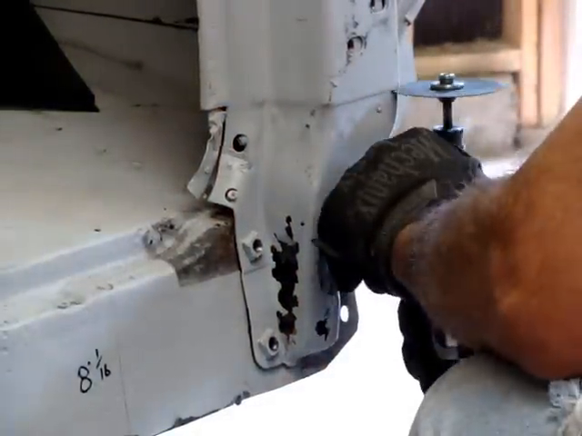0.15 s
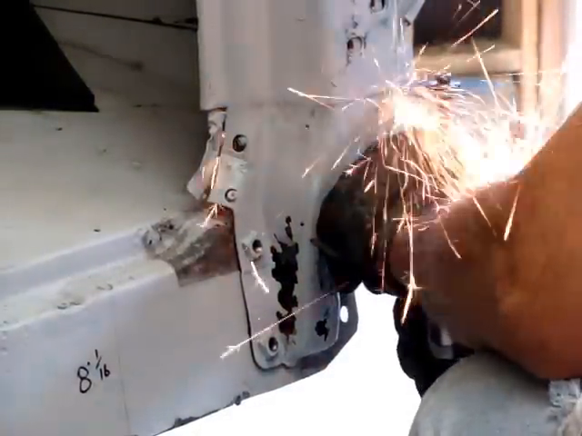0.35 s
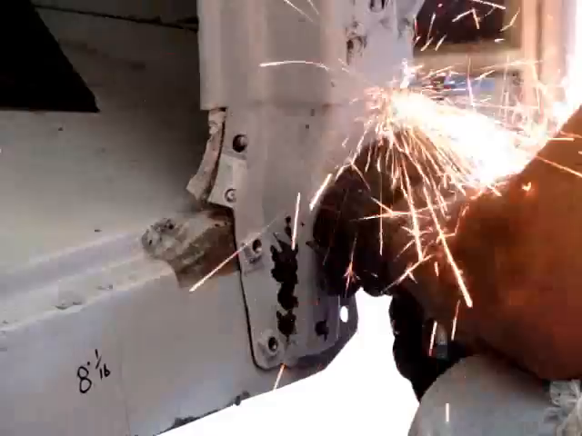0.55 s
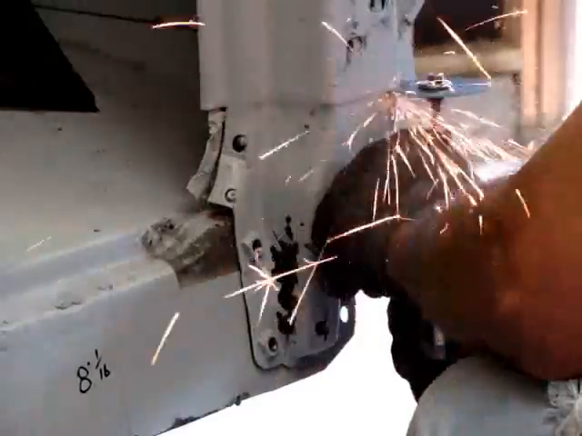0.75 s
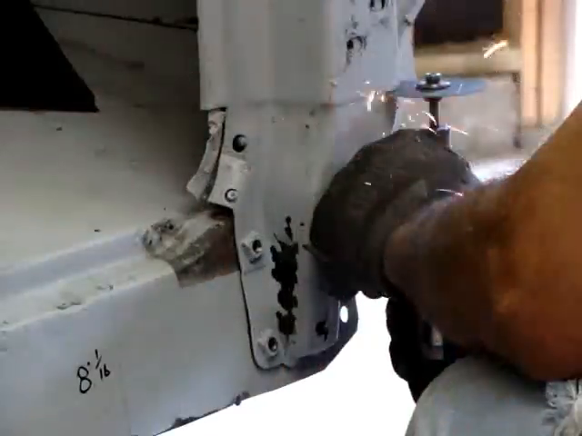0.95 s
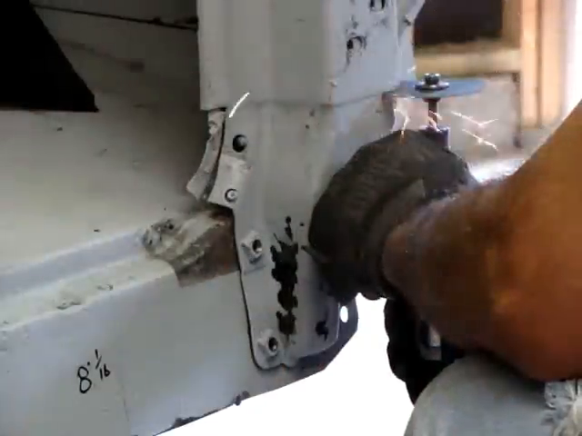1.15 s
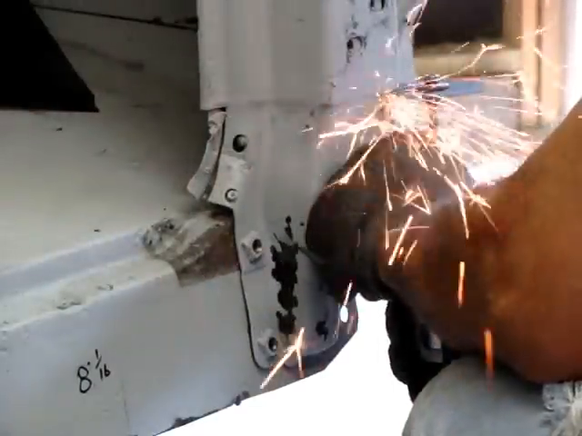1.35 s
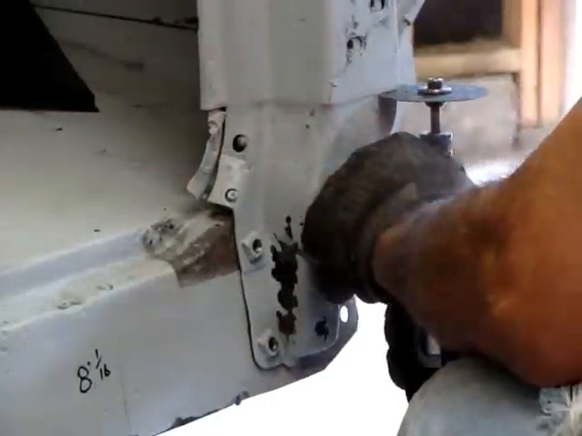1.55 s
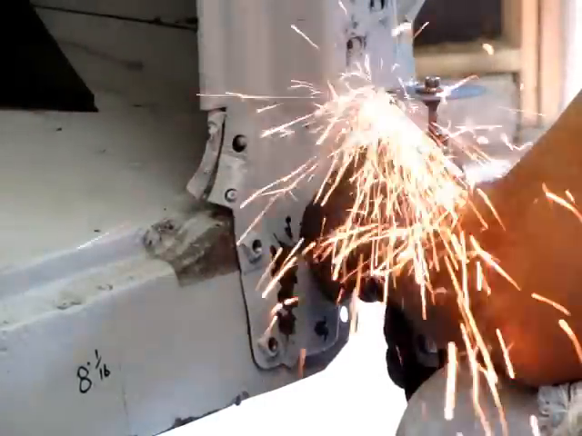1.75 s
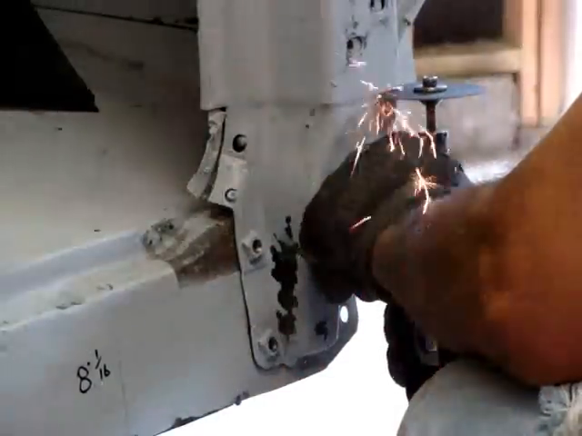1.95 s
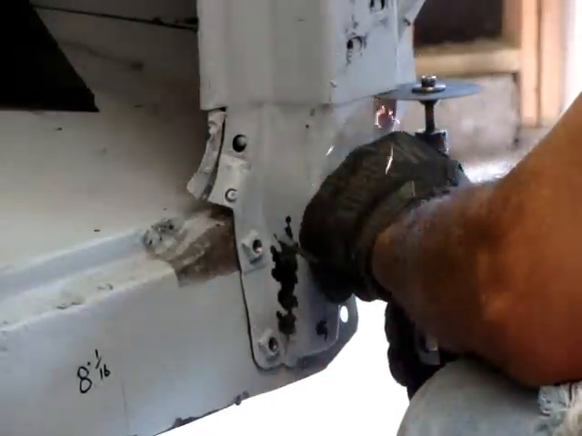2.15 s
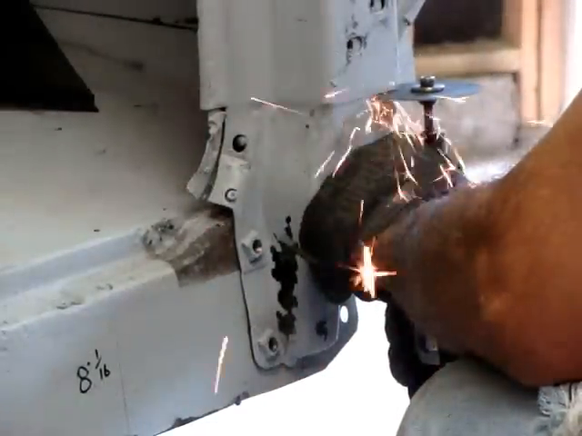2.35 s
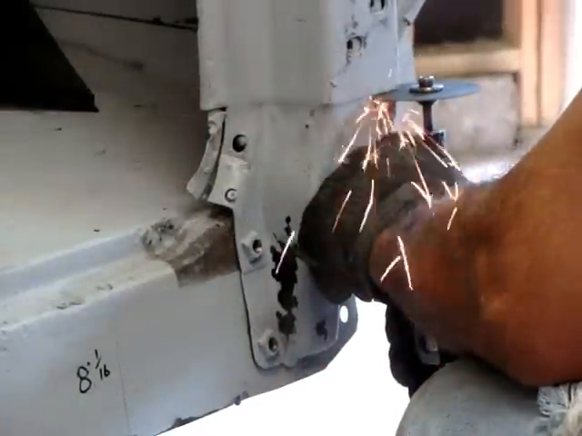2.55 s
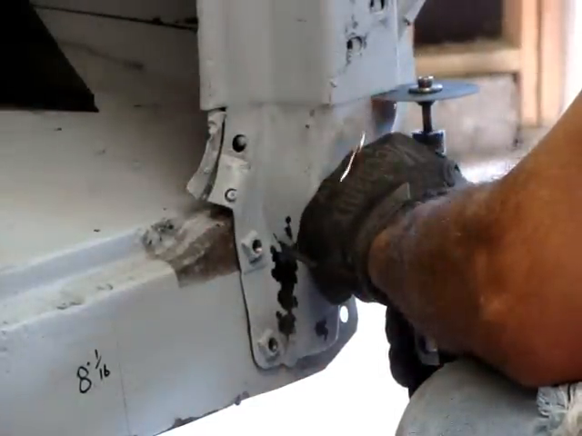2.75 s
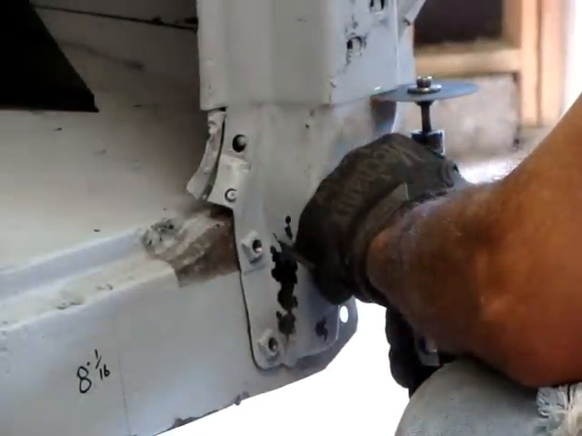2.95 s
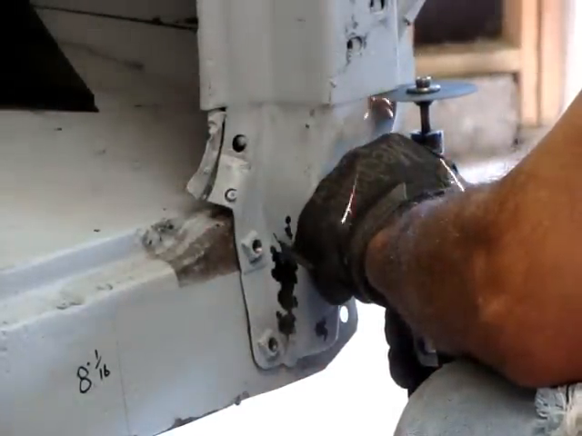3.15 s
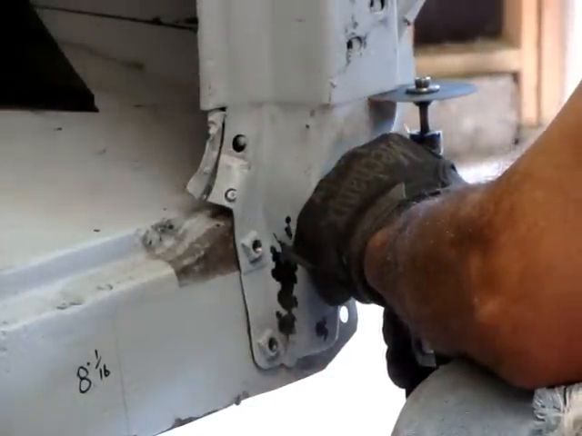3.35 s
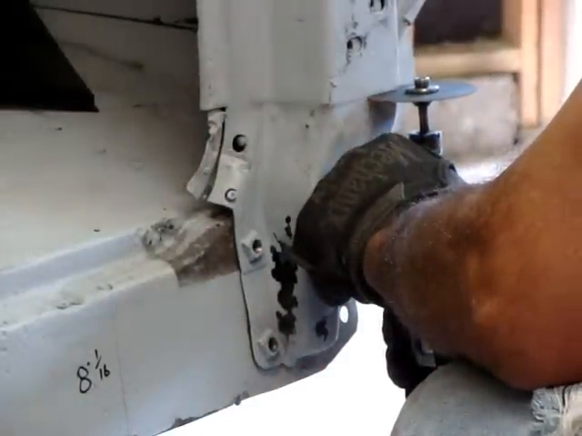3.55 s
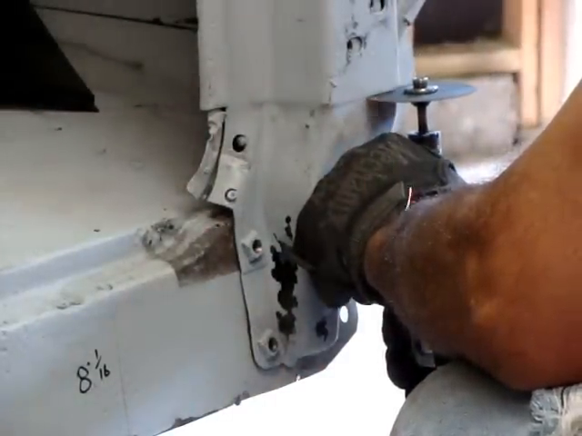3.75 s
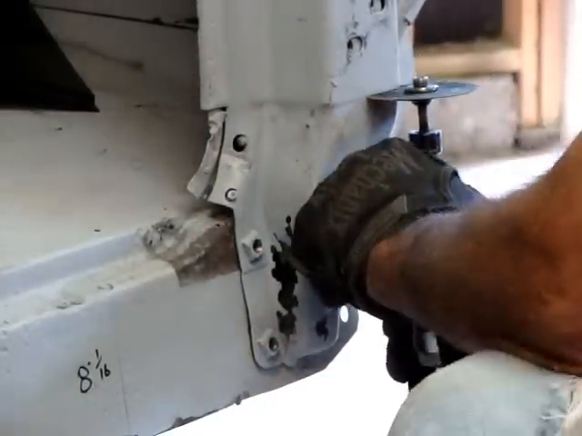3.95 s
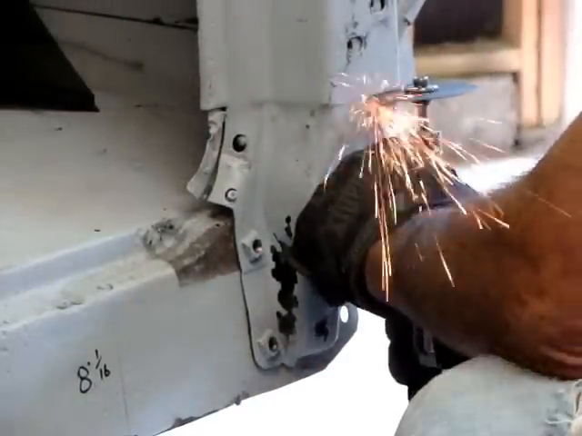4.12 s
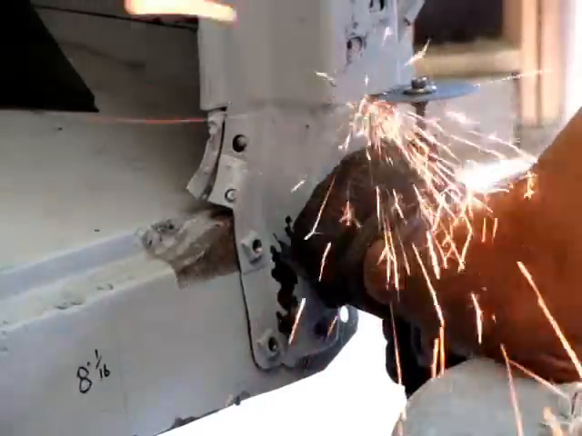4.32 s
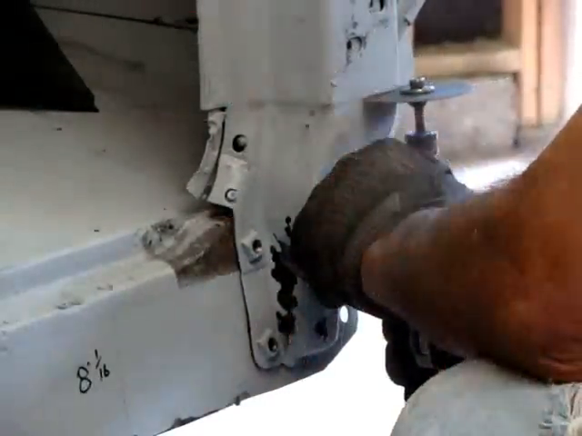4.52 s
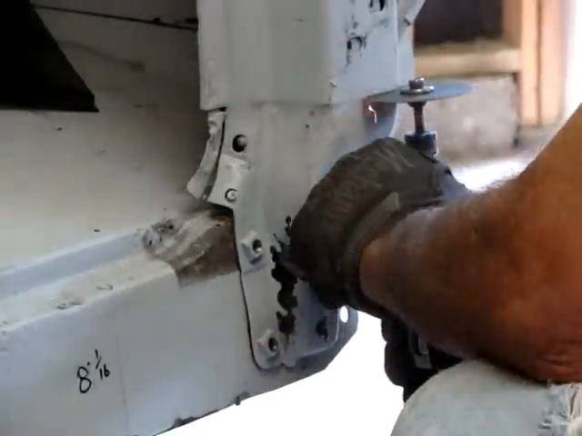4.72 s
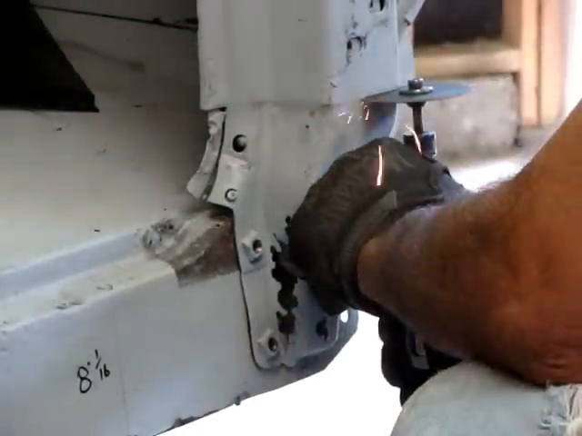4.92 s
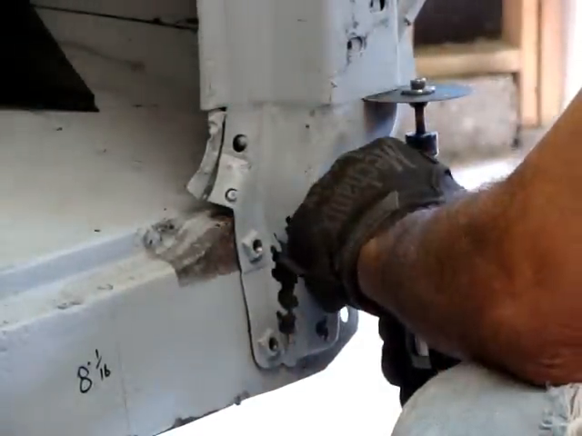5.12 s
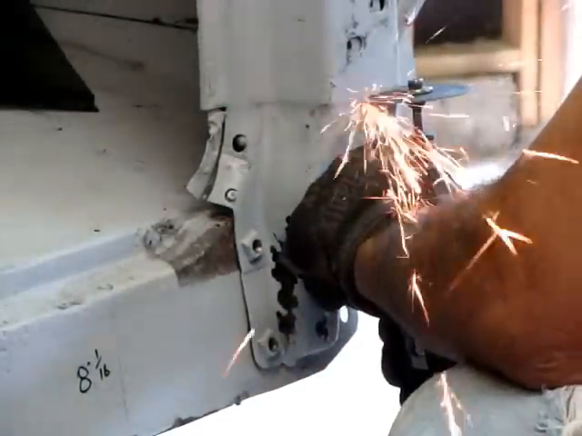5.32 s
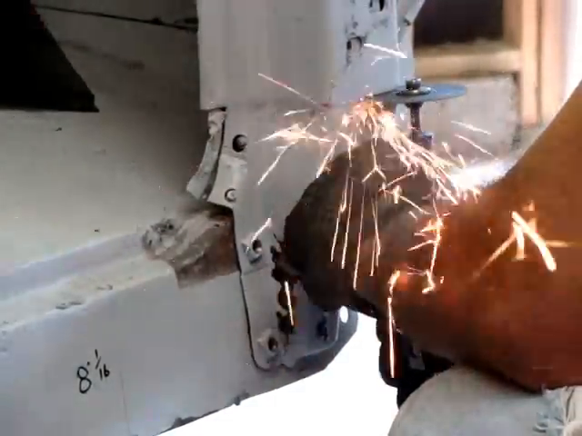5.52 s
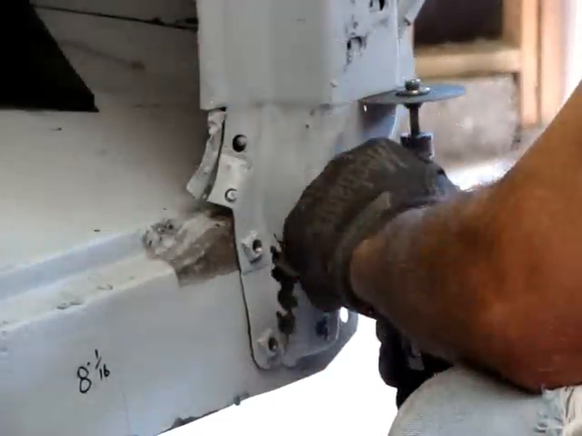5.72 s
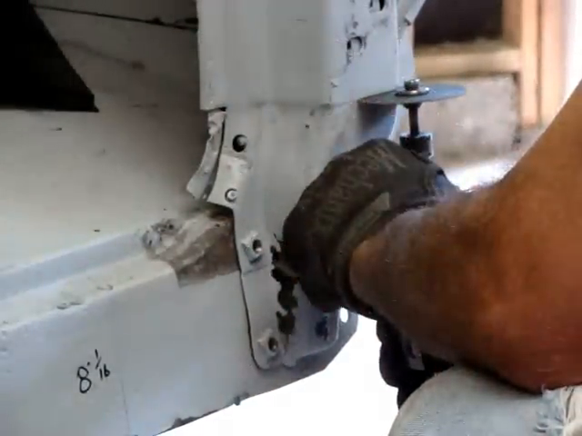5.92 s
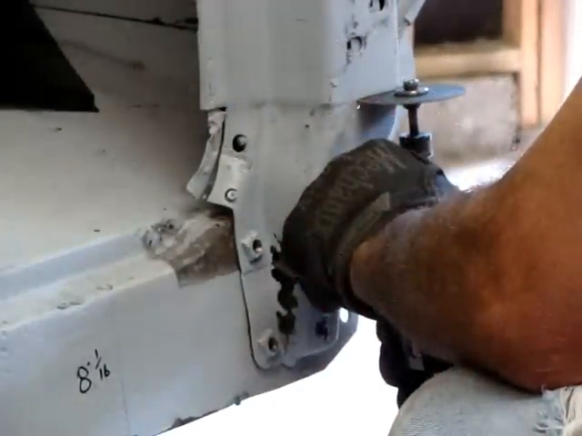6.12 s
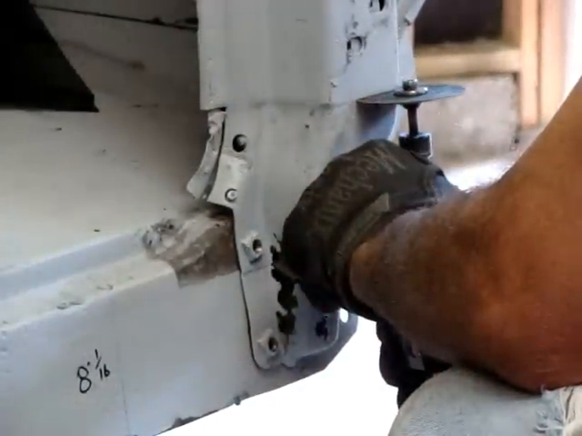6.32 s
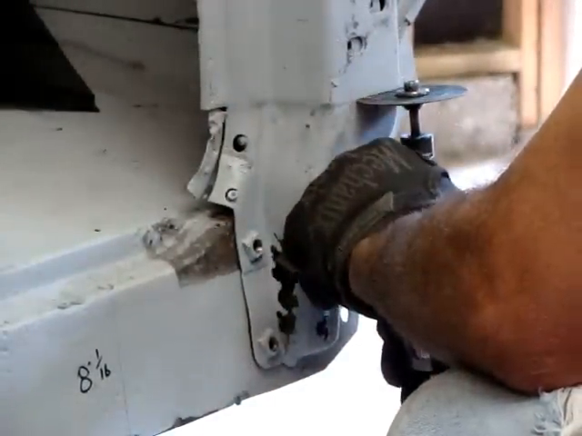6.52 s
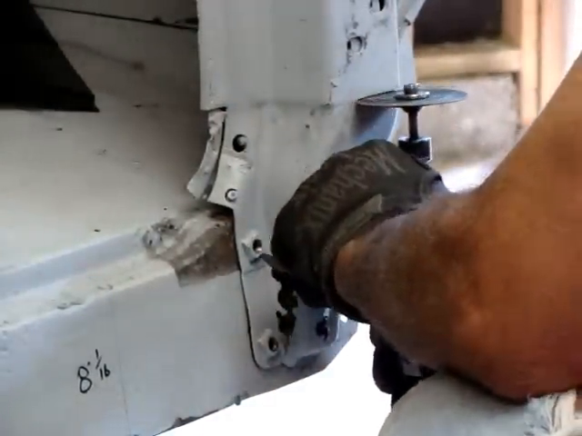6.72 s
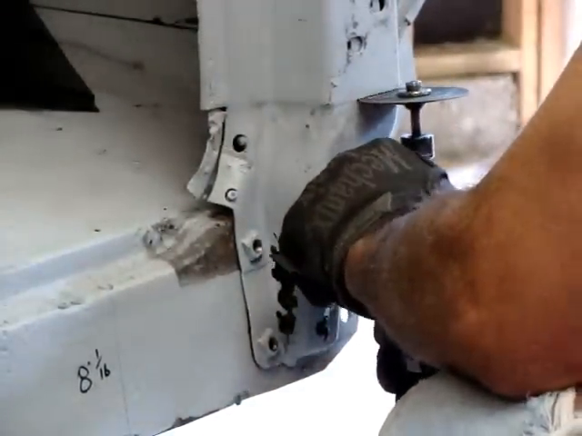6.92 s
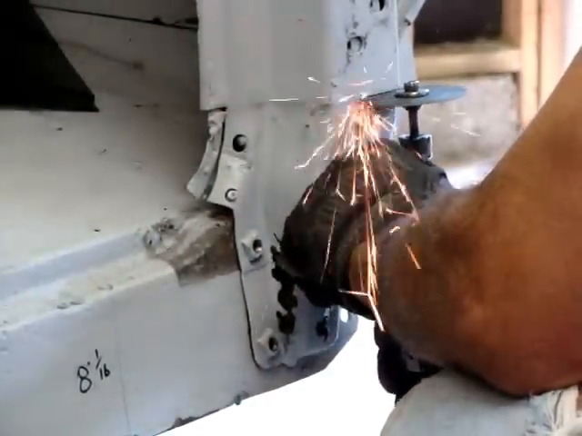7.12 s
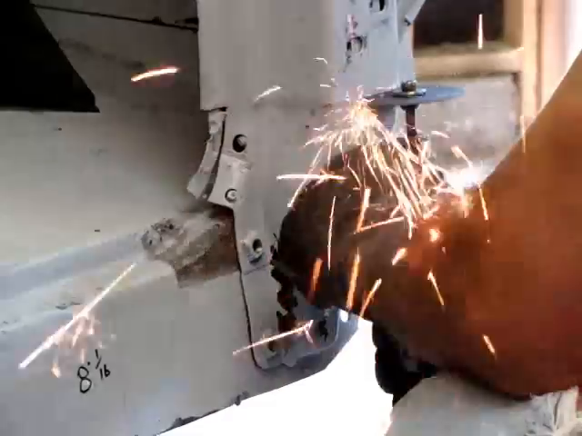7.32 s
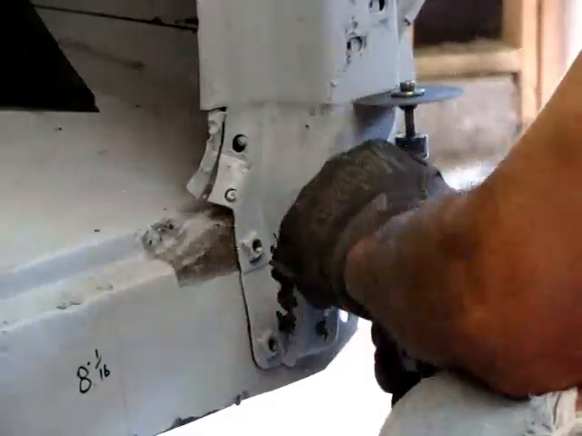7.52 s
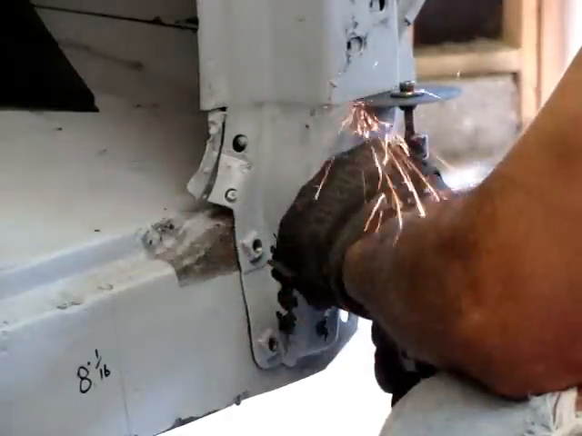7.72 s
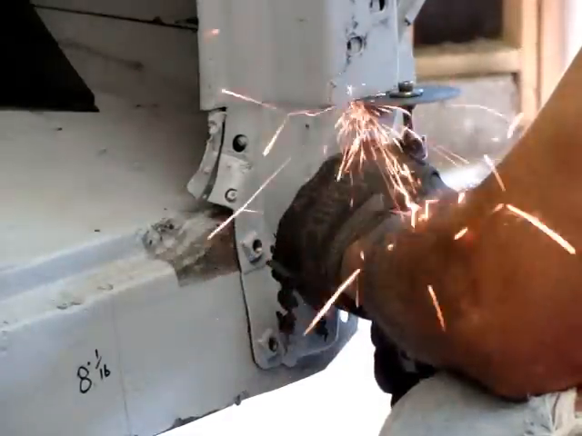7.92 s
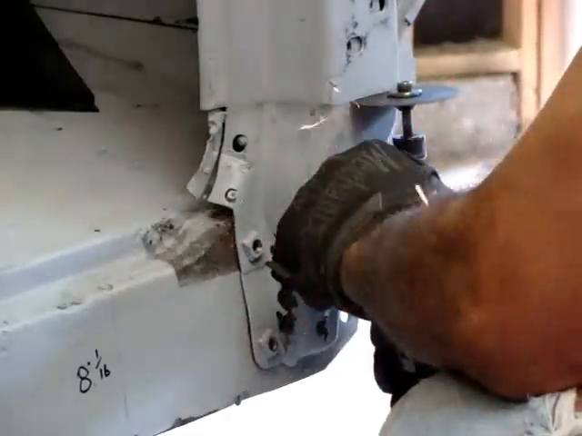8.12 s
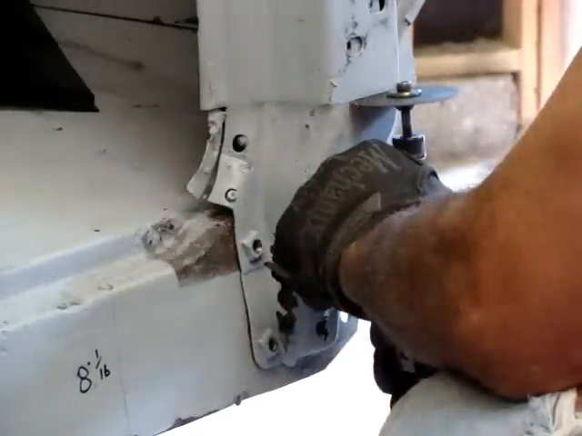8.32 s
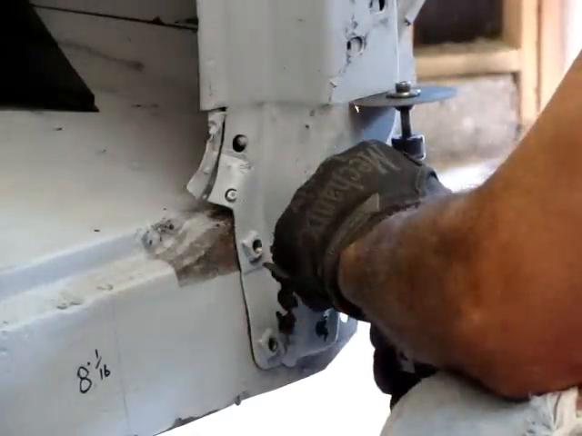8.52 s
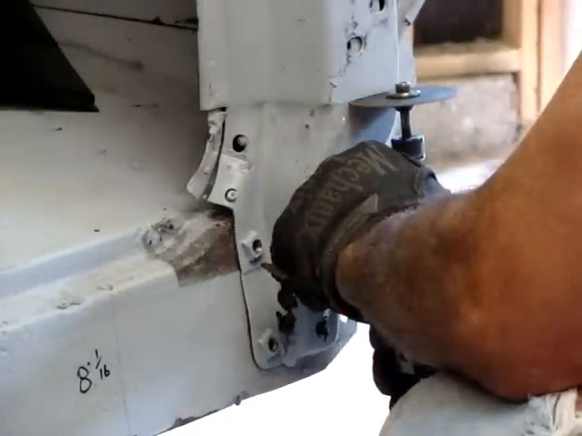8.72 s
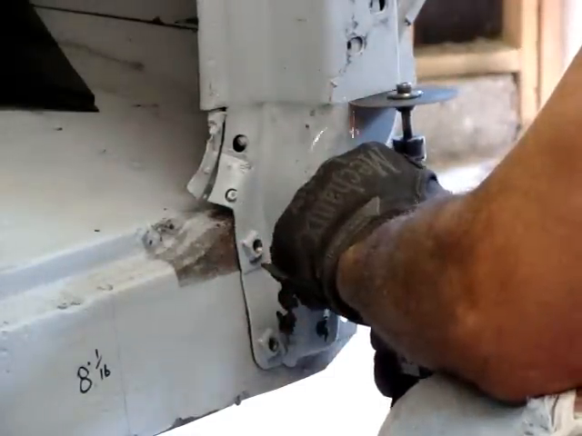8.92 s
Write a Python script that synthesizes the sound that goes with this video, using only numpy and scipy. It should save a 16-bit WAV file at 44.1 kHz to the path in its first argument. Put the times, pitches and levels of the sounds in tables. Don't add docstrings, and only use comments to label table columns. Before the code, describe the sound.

A small air-driven cutting wheel shrieks up, then bogs down rasping and hissing through sheet steel in repeated passes, with a compressor chugging briefly between cuts.

```python
import sys
import numpy as np
from scipy import signal
from scipy.fft import rfft, irfft
from scipy.io import wavfile
from scipy.ndimage import uniform_filter1d

SR = 44100
rng = np.random.default_rng(int(sys.argv[2]) if len(sys.argv) > 2 else 0)


def invert_db(level):
    return 10 ** (np.asarray(level, dtype=float) / 20)


def output_pcm(signal):
    pcm = np.clip(np.atleast_2d(signal).T, -1, 1) * 32767
    wavfile.write(sys.argv[1], SR, np.round(pcm).astype(np.int16))


N = 395136
TIME_S = np.arange(N) / SR

# [opens t/s, shuts t/s]
VALVE_OPEN = [
    (0.307, 1.57),
    (1.718, 3.93),
    (4.107, 5.1),
    (5.343, 6.46),
    (7.105, 9.1),
]
# [top t/s, top vane rate f/Hz, bog t/s, bog vane rate f/Hz,
# lateness of the fall (0-2)]
SPEED_SURGES = [(.44, 2176, .76, 790, 1.0), (.83, 800, .91, 675, 1.0), (.95, 660, 1.14, 454, .9),
                (1.49, 1090, 1.7, 450, 1.1), (1.83, 1170, 2.0, 500, .9), (2.09, 615, 2.216, 383, 1.0),
                (2.32, 510, 2.37, 495, 1.0), (2.48, 705, 2.53, 722, 1.0), (2.57, 716, 2.875, 406, .65),
                (2.99, 545, 3.094, 357, 1.0), (3.237, 559, 3.337, 378, 1.0), (3.42, 405, 3.64, 355, .4),
                (3.75, 536, 3.86, 420, 1.0), (4.235, 1910, 4.42, 900, .95), (4.45, 870, 4.78, 345, .45),
                (4.89, 565, 5.13, 279, 1.4), (5.437, 1425, 5.6, 860, .9), (5.63, 820, 5.773, 355, .7),
                (5.884, 452, 6.04, 335, .6), (6.24, 412, 6.36, 318, 1.0), (7.19, 1540, 7.68, 330, .85),
                (7.925, 980, 8.29, 415, 1.1), (8.5, 425, 8.575, 322, 1.0), (8.85, 410, 8.99, 350, 1.0)]


def rotor():
    starting_hz, spin_up_haste = 340.3, 2.3
    vane_hz = np.full(N, starting_hz)
    from_s, from_hz = 0, starting_hz
    for top_s, top_hz, bog_s, bog_hz, late in SPEED_SURGES:
        opened = max(opens for opens, _ in VALVE_OPEN if opens < top_s)
        fresh = opened > from_s
        if fresh:
            from_s, from_hz = opened, starting_hz
        rise = np.clip((TIME_S - from_s) / (top_s - from_s), 0, 1)
        fall = np.clip((TIME_S - top_s) / (bog_s - top_s), 0, 1)
        if fresh:
            rise = 1 - (1 - rise) ** spin_up_haste
        else:
            rise = np.sin(np.pi / 2 * rise) ** 2
        fall = np.sin(np.pi / 2 * fall ** late) ** 2
        shape = from_hz + (top_hz - from_hz) * rise + (bog_hz - top_hz) * fall
        vane_hz = np.where(TIME_S >= from_s, shape, vane_hz)
        from_s, from_hz = bog_s, bog_hz
    turn_hz = uniform_filter1d(vane_hz, size=600) / 4
    snatch = .003 + .045 * np.maximum(np.log2(135 / turn_hz), 0)
    turn_hz = turn_hz * (1 + snatch * drift(30))
    return turn_hz, 2 * np.pi * np.cumsum(turn_hz) / SR


# [multiple of the turn rate, level/dB]
ROTOR_ORDERS = [(2, -20), (3, -24), (4, 3.5), (5, -22), (6, -21), (7, -25), (8, 0.5), (9, -14), (10, -15),
                (11, -19), (12, -1.5), (13, -21), (14, -20), (15, -21), (16, -4), (20, -16), (24, -19)]
# [f/Hz, level/dB]
PORT_RESPONSE = [(250, -26), (500, -29), (800, -13), (1100, -4.5), (1500, -3), (2100, 0), (2800, 3),
                 (3500, 1), (3750, -13), (4400, -14), (4900, -1), (5400, 3), (6500, 2), (8000, -9)]


def whine(turn_hz, angle):
    valve = sum((TIME_S > opens) & (TIME_S < shuts) for opens, shuts in VALVE_OPEN) * 1.
    valve = uniform_filter1d(valve, size=700)
    waver = drift(22)
    orders = np.zeros(N)
    for order, level_db in ROTOR_ORDERS:
        waver_db = 2.8 * np.roll(waver, rng.integers(N))
        gain = invert_db(level_db + at_hz(PORT_RESPONSE, order * turn_hz) + waver_db)
        if order % 4:
            gain *= invert_db(8 * np.log2(turn_hz / 200))
        orders += gain * np.sin(order * angle + rng.uniform(0, 2 * np.pi))
    scrape_n = np.arange(220)
    scuff = rng.standard_normal(220) * np.exp(-scrape_n / 70)
    once_a_turn = np.diff(angle // (2 * np.pi), prepend=0)
    ticks = invert_db(1) * coloured(signal.fftconvolve(once_a_turn, scuff)[:N], AIR_SPECTRUM)
    duck_db, _, bite_db = starts()
    level_db = -26 - 2.5 * np.log2(turn_hz / 125) + 0.17 * duck_db + 0.7 * bite_db
    return valve * invert_db(level_db) * (orders + ticks)


# [f/Hz, density level/dB]
AIR_SPECTRUM = [(1650, -106), (2800, -6), (3150, -6), (4470, -2), (4980, -3), (6110, 1.5), (8060, -1.5),
                (10500, -2.5), (15100, -5), (16000, -1)]
# [f/Hz, density level/dB]
RASP_SPECTRUM = [(110, -54), (180, -18.5), (397, -10.5), (559, -7.5), (1080, -3.5), (1170, -2.5),
                 (1600, -4), (2200, 1.5), (2410, -1.5), (4200, -14), (5460, -23), (9240, -120)]
# [f/Hz, density level/dB]
DRAUGHT_SPECTRUM = [(20, 0), (60, -3.5), (150, -4.5), (300, -8), (500, -7.5)]


def cutting(turn_hz, angle):
    racing = np.maximum(np.log2(turn_hz / 130), 0)
    duck_db, gust_db, bite_db = starts()
    hiss_db = airflow(1) + duck_db
    rasp_db = airflow(0.94) + 0.43 * duck_db + bite_db - 3.5 - 3 * racing
    wind_db = np.maximum(airflow(2.1) - 27.5 + racing, gust_db)
    grain_size = np.minimum(rng.exponential(1, N), 3)
    grit = rng.standard_normal(N) * invert_db(3.05 * grain_size)
    grit *= invert_db(0.48 * drift(15) + 0.28 * drift(6))
    grit *= 1 + 0.13 * np.sin(4 * angle) + 0.017 * np.sin(angle)
    air = invert_db(hiss_db - 1.5) * coloured(grit, AIR_SPECTRUM)
    air = air + sum(0.19 * drift(2.6) * resonate(air, hz, 0.47 * hz) for hz in (3700, 5550, 8400, 12300))
    rasp = invert_db(rasp_db - 6.5 + 0.54 * drift(10.3)) * coloured(grit, RASP_SPECTRUM)
    wind = invert_db(wind_db + 1.8 * drift(5.1)) * coloured(rng.standard_normal(N), DRAUGHT_SPECTRUM)
    return air + rasp, wind


# [opens t/s, shuts t/s, hiss level/dB, swell t/s, fade rate/(dB/s)]
VALVE_FLOW = [
    (.205, .33, -21, 0.065, 300),
    (0.308, 1.56, -15, .02, 270),
    (1.701, 3.903, -14.5, 0.046, 157),
    (4.101, 5.086, -14, .012, 213),
    (5.13, 5.22, -29.5, .01, 204),
    (5.229, 5.253, -19.5, .004, 230),
    (5.334, 6.441, -14, 0.027, 200),
    (6.47, 6.573, -24.5, .01, 200),
    (7.075, 9.099, -14.5, .03, 200),
]


def airflow(fade_share):
    levels = []
    for opens, shuts, level_db, swell, fade in VALVE_FLOW:
        growth_db = 6 * np.clip(1 - (TIME_S - opens) / swell, 0, 1)
        decay_db = fade_share * fade * np.maximum(TIME_S - shuts, 0)
        levels.append(np.where(TIME_S < opens, -90, level_db - growth_db - decay_db))
    return np.max(levels, axis=0)


# [t/s, duck level/dB, recovery t/s, gust level/dB, bite level/dB]
START_EVENTS = [
    (.2, -1.5, .3, -36, -1),
    (.315, -7.5, 0.16, -30, 11),
    (1.72, -2, 0.27, -43, 1.5),
    (4.105, -2.5, 0.45, -37, 3),
    (5.35, 1.5, 0.42, -38, 5),
    (7.1, -1.5, 0.17, -34, 5),
]


def starts():
    duck_db, bite_db, gusts = np.zeros(N), np.zeros(N), []
    for start_s, duck, recovery_s, gust, bite in START_EVENTS:
        since = TIME_S - start_s
        after = np.maximum(since, 0)
        duck_db += duck * (1 - np.exp(-after / 0.053)) * np.exp(-after / recovery_s)
        gusts.append(np.where(since < 0, -90, gust - 124 * since))
        bite_db += bite * (since > 0) * np.exp(-(since / 0.062) ** 2)
    return duck_db, np.max(gusts, axis=0), bite_db


# [f/Hz, bandwidth f/Hz, level/dB]
PANEL_MODES = [(917, 38, 0.5), (1083, 25.7, 6), (1462, 50, -1), (1612, 25, 4), (1685, 24, 6.5),
               (1831, 68, 4), (2028, 47, 1), (2240, 30, 2.5), (2528, 39, 3), (2670, 39, 2.5), (3121, 28, 3),
               (3500, 15, 0.5), (3917, 10, 7.5), (4970, 81, 2), (5340, 59, 4), (5770, 34, 3),
               (6210, 83, -9), (6750, 33, 1), (7360, 136, -11.5), (8520, 94, -13), (9200, 71, -16),
               (10570, 110, -0.5)]


def panel(x):
    ringing = np.zeros(N)
    for hz, width_hz, height_db in PANEL_MODES:
        ringing += invert_db(height_db + 2.6 * drift(5)) * resonate(x, hz, width_hz)
    return x + ringing


# [start t/s, length t/s, f/Hz, level/dB]
VALVE_LEAKS = [
    (0.22, 0.12, 5000, -22.5),
    (0.252, 0.044, 7400, -24),
    (3.947, 0.067, 6150, -41),
    (5.147, 0.06, 6000, -38),
    (6.484, .12, 5880, -27.5),
]


def leaks():
    out = np.zeros(N)
    for start_s, length_s, hz, level_db in VALVE_LEAKS:
        swell = np.sin(np.linspace(0, np.pi, round(length_s * SR)))
        whistle = resonate(resonate(rng.standard_normal(len(swell)), hz, 350), hz, 350)
        at = round(start_s * SR)
        out[at:at + len(swell)] += invert_db(level_db) * swell * rms_one(whistle)
    return out


# [t/s, peak level/dB, treble level/dB re peak, T60 t/s]
TOOL_KNOCKS = [
    (0.008, -10.5, -26.5, 0.18),
    (0.112, -11.5, -41, 0.11),
    (0.127, -16.5, -24.5, 0.26),
    (0.202, -20.5, -14, 0.15),
    (0.222, -24, -8, 0.21),
    (1.704, -34, -11, 0.1),
    (4.087, -22, -23, 0.15),
    (5.233, -21, -19, 0.17),
]
# [f/Hz, bandwidth f/Hz, level/dB]
RATTLE_MODES = [(492, 125, 4), (806, 86, 4.5), (880, 160, 1), (1610, 280, 1), (2630, 470, 1),
                (3450, 310, -21), (5040, 460, 16.5), (5700, 700, 16), (7400, 330, 15), (9800, 610, -2)]


def knocks():
    out = np.zeros(N)
    t = np.arange(SR // 4) / SR
    for knock_s, peak_db, treble_db, t60 in TOOL_KNOCKS:
        rattle = rng.standard_normal(len(t)) * invert_db(-60 * t / t60) * np.minimum(t / 0.0018, 1)
        hit = invert_db(treble_db + 1) * np.diff(rattle, prepend=0)
        for hz, width_hz, level_db in RATTLE_MODES:
            mode_db = level_db + (treble_db + 4.5) * (hz > 4000)
            hit += invert_db(mode_db) * resonate(resonate(rattle, hz, 2.4 * width_hz), hz, width_hz)
        at = round(knock_s * SR)
        out[at:at + len(t)] += invert_db(peak_db + 2.5) * hit
    return out


def garage(x):
    t, t60_s = np.arange(SR // 2) / SR, 0.19
    tail = rng.standard_normal(len(t)) * invert_db(-60 * t / t60_s) * (t > .006)
    return signal.fftconvolve(x, tail / np.sqrt(np.sum(tail ** 2)))[:N]


# [t/s, level/dB]
PUMP_LEVEL = [
    (6.45, -27),
    (6.6, -27),
    (6.7, -22),
    (6.85, -17.5),
    (7.0, -16),
    (7.09, -16.5),
    (7.13, -26),
    (7.2, -45),
]
# [f/Hz, level/dB]
PISTON_LINES = [(393.0, -40.5), (441.4, -44), (635.2, -37), (683.7, -33.5), (732.1, -37), (882.9, -44),
                (1055, -31.5), (1077, -27.5), (1125, -50), (1174, -52), (1292, -37.5), (1470, -52),
                (1642, -40), (1911, -41)]
# [f/Hz, density level/dB]
CLATTER_SPECTRUM = [(15, -77), (25, -31), (178, -31.5), (289, -21.5), (322, -23), (389, -17), (598, -20),
                    (703, -22), (782, -11.5), (1050, -8), (2060, -17.5), (4620, -15), (7700, -18.5),
                    (15500, -21.5)]


def compressor():
    stroke_hz = 24.48
    turns = stroke_hz * TIME_S
    lines = np.zeros(N)
    for hz, level_db in PISTON_LINES:
        harmonic = np.round(hz / stroke_hz)
        lines += invert_db(level_db) * np.sin(2 * np.pi * harmonic * turns + rng.normal(0, 0.6))
    throb = invert_db(-5.0 * (2 * turns % 1) - 0.7 * (turns % 1))
    clatter = coloured(rng.standard_normal(N), CLATTER_SPECTRUM) * throb
    clatter = rms_one(clatter + invert_db(2) * resonate(clatter, 4600, 70))
    level_s, level_db = np.transpose(PUMP_LEVEL)
    lifted_db = np.interp(TIME_S, level_s, level_db, left=-90, right=-90)
    return invert_db(lifted_db) * (clatter + invert_db(-5.0) * rms_one(lines))


# [f/Hz, density level/dB]
HUSH_SPECTRUM = [(20, -4), (200, -17.5), (500, 1), (1100, 0), (2500, -11.5), (6000, -16), (16000, -29)]


def hush():
    return invert_db(-39) * coloured(rng.standard_normal(N), HUSH_SPECTRUM)


PATCH_TIMES = [1.12, 2.88, 3.18, 3.2, 3.25, 3.56, 3.76, 3.83, 3.9, 4.88, 6.22, 6.41, 7.17, 7.94, 8.06, 8.12,
               8.24, 8.27, 8.29, 8.47, 8.5, 8.52, 8.57, 8.59]


def side_patches():
    side = np.zeros(N)
    frame = np.sin(np.pi * np.arange(1500) / 1500) ** .5
    for centre_s in PATCH_TIMES:
        low_hz = rng.uniform(5000, 12500)
        band = signal.butter(4, [low_hz, low_hz + 2200], "band", fs=SR, output="sos")
        at = round(centre_s * SR) - len(frame) // 2
        side[at:at + len(frame)] += frame * signal.sosfilt(band, rng.standard_normal(len(frame)))
    return invert_db(-18.5) * side * [[1], [-1]]


def rms_one(x):
    return x / np.sqrt(np.mean(x ** 2) + 1e-20)


def at_hz(points, hz):
    point_hz, level_db = np.transpose(points)
    return np.interp(np.log(hz), np.log(point_hz), level_db)


def coloured(x, spectrum):
    hz = np.maximum(np.arange(N // 2 + 1) * SR / N, 1)
    inside = (hz >= spectrum[0][0]) & (hz <= spectrum[-1][0])
    return rms_one(irfft(rfft(x) * invert_db(at_hz(spectrum, hz)) * inside, N))


def drift(rate_hz):
    step = 40
    lowpass = signal.butter(2, rate_hz, fs=SR / step, output="sos")
    slow = signal.sosfilt(lowpass, rng.standard_normal(N // step + 2002))[2000:]
    return np.interp(np.arange(N) / step, np.arange(len(slow)), rms_one(slow))


def resonate(x, hz, width_hz):
    r = np.exp(-np.pi * width_hz / SR)
    zeros = [(1 - r * r) / 2, 0, (r * r - 1) / 2]
    poles = [1, -2 * r * np.cos(2 * np.pi * hz / SR), r * r]
    return signal.lfilter(zeros, poles, x)


def scene():
    turn_hz, angle = rotor()
    tones = whine(turn_hz, angle)
    cut, wind = cutting(turn_hz, angle)
    bumps = knocks() + leaks()
    cut = cut * invert_db(-2.5 * np.clip(np.log2(turn_hz / 130), 0, 1))
    tool = panel(invert_db(2) * tones + invert_db(-10) * garage(tones) + cut)
    mono = tool + bumps + invert_db(-2) * garage(bumps) + wind + compressor() + hush()
    return np.array([mono, mono])


def roll_off(x):
    return signal.sosfilt(signal.butter(12, 16850, fs=SR, output="sos"), x)


def record(dry):
    rounded = .95 * np.tanh(dry / .95) + side_patches()
    top_cut = signal.ellip(12, .5, 80, 15720, fs=SR, output="sos")
    finished = signal.sosfilt(top_cut, rounded)
    return roll_off(finished)


dry = scene()
out = record(dry)
output_pcm(out)
```